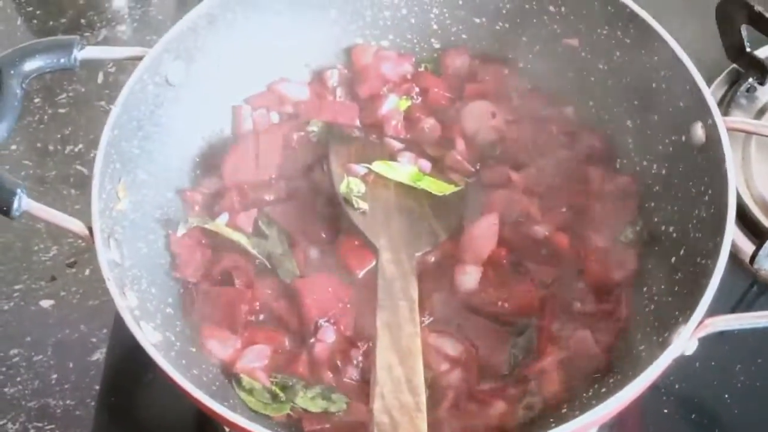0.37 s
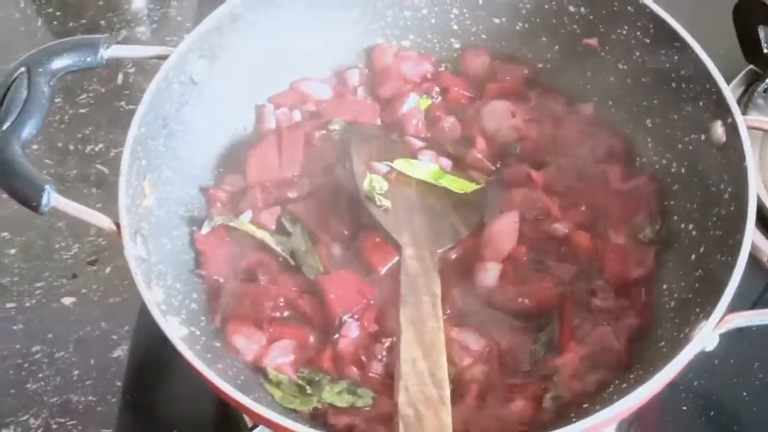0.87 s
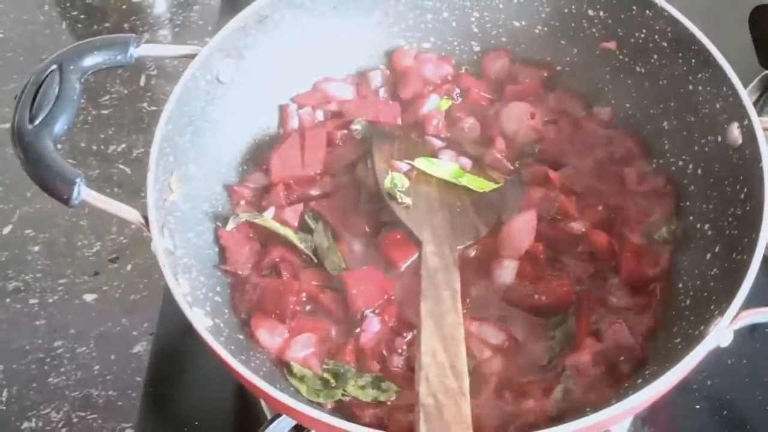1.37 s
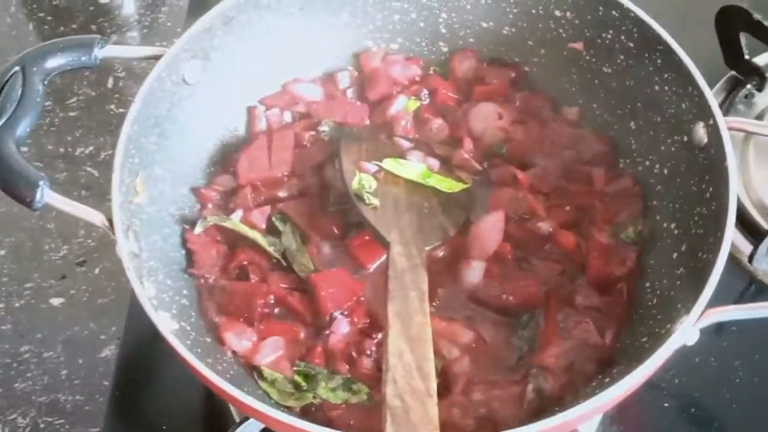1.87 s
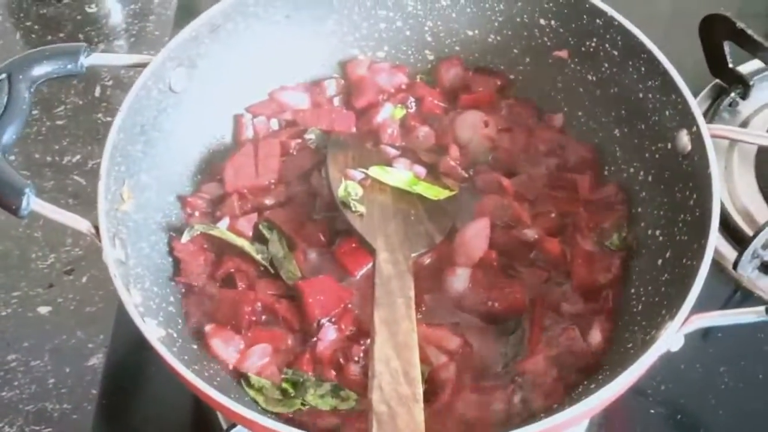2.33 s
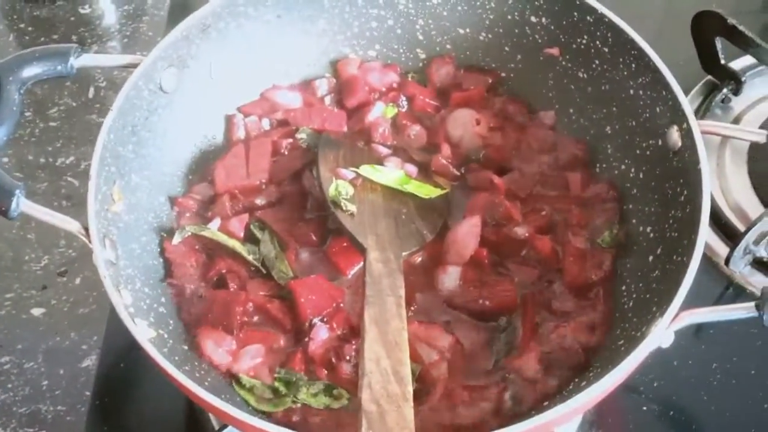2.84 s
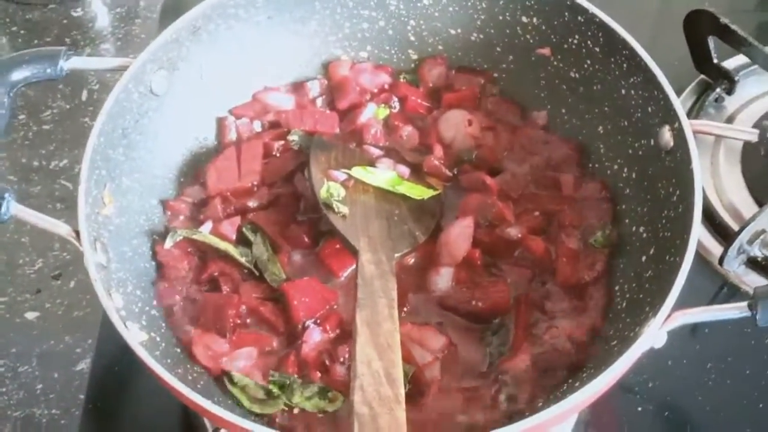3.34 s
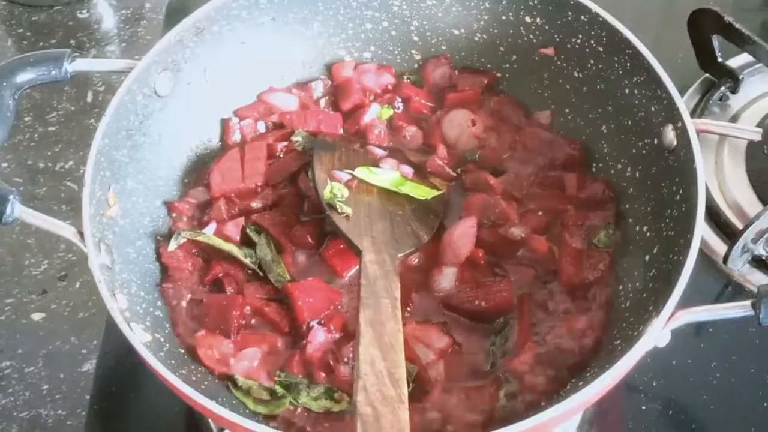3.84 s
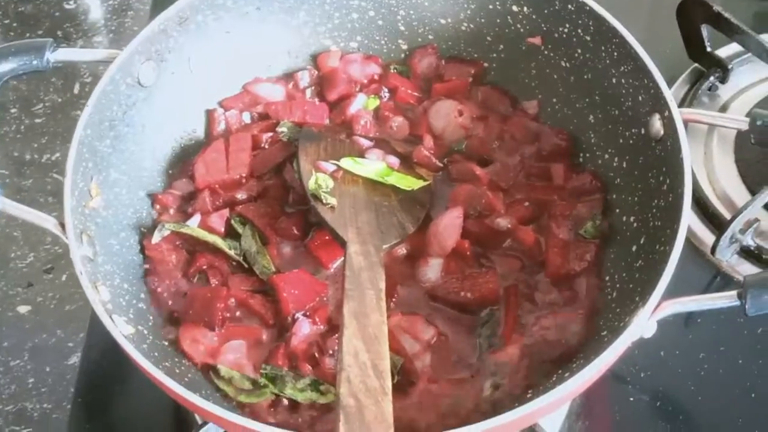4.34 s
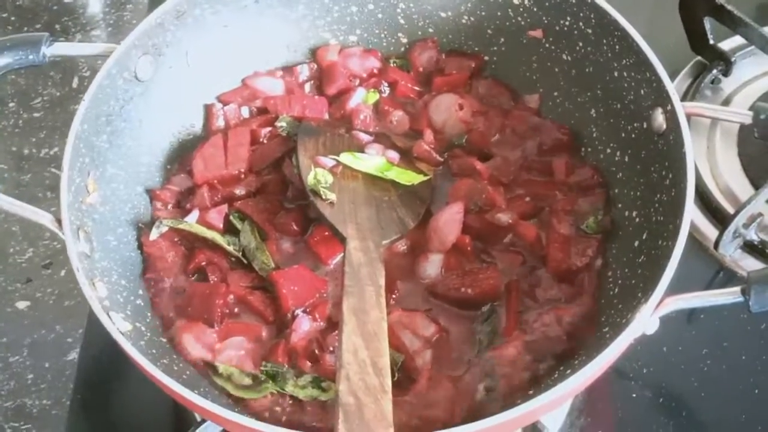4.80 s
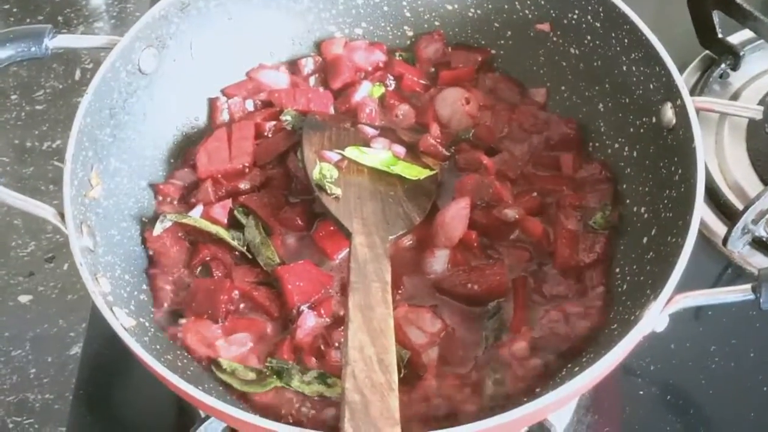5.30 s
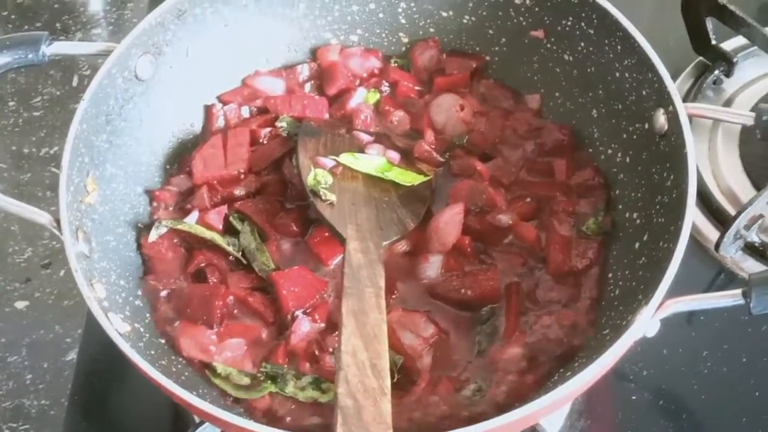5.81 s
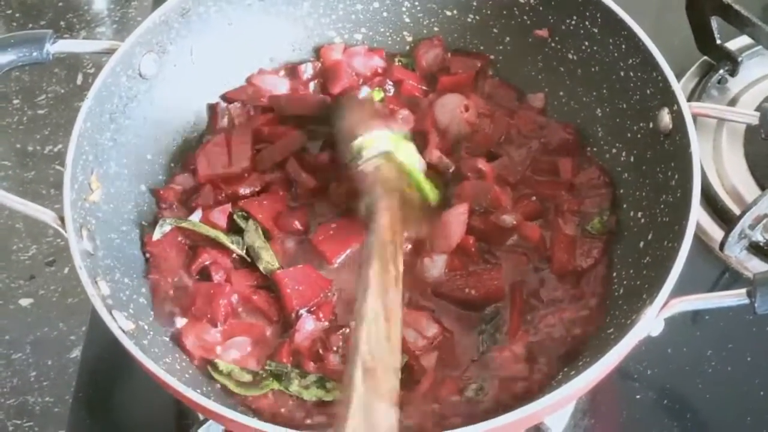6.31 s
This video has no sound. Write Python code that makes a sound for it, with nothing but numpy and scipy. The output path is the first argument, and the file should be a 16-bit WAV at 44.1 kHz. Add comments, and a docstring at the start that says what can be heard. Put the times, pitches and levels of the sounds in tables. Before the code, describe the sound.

Loud crackling sizzle in a hot pan, popping and spitting, gradually calms while utensils knock and a steel vessel clinks nearby in a kitchen.

```python
"""Pan cooling on a stove

Water sizzles under chopped vegetables in a hot pan and calms as it cools: noise hiss, a crackle of short damped
sines, loud pops and thin ticks; the pan's bowl colours hiss, crackle and pops. Utensils knock (filtered noise
bursts), a steel vessel rings (decaying modes), a far engine drones (wandering sines) in the room air.
At the end a spatula stirs the sizzle up again."""
import sys
import numpy as np
from scipy import signal
from scipy.fft import rfft, irfft
from scipy.io import wavfile
from scipy.ndimage import uniform_filter1d, map_coordinates

SR = 44100
rng = np.random.default_rng(int(sys.argv[2]) if len(sys.argv) > 2 else 0)


def to_linear_factor(level_db):
    """Convert decibel levels (scalar or array-like) to linear amplitude factors."""
    exponent = np.asarray(level_db, float) / 20
    return 10 ** exponent


def master_out(mix):
    """Clip the mix to full scale and print it as 16-bit PCM to the path in sys.argv[1]."""
    frames = np.transpose(np.atleast_2d(mix))
    ceiling = np.clip(frames, -1, 1)
    pcm = np.round(ceiling * 32767).astype(np.int16)
    wavfile.write(sys.argv[1], SR, pcm)


N = 294147

# kitchen air colour: (frequency [Hz], relative density [dB per Hz])
AIR_COLOUR = [(15, -42), (25, -11), (81, 0.5), (135, -3), (194, 0.5), (264, -1.5), (395, 0.5), (530, 0.5),
              (700, -5), (910, -40), (1540, -120)]
# far drone tones: (multiple of ENGINE_HZ [-], light-load level [dB], full-load level [dB], wander [dB]); orders
# 3, 5, 6 and 7 are the engine's, the first row is another low hum that follows the same pitch wander
DRONE_TONES = [(2.7, -10, 0, 3), (3, 0, -18, 2), (5, -17, -8, 2), (6, -7, -1, 1.5), (7, -11, -2, 2.5)]
# engine course: (time [s], load [0-1], base level of the tones [dB])
ENGINE_LOAD = [(0, .2, -58), (.9, 0.26, -60.5), (1.3, 0.8, -60.5), (2.4, 0.13, -54.5), (3.05, 0.97, -55.5),
               (3.8, 1, -59.5), (4.14, 1, -56), (4.4, 0, -55.5), (5.46, 0, -56), (6.67, 0, -56.5)]
# kitchen echo decay: (frequency [Hz], t60 [s])
ECHO_T60 = [(300, 0.95), (1500, 0.8), (6000, 0.21)]
# knocks beside the stove:
# (time [s], relative thud level [dB], thud centre [Hz], relative clack level [dB], contact t60 [s])
KNOCK_EVENTS = [(1.852, -21, 640, -36, 0.11), (1.868, -23, 1250, -24, 0.13),
                (2.895, -24.5, 710, -25, 0.094), (2.955, -23.5, 700, -27, 0.14),
                (2.967, -19, 915, -14.5, 0.17), (3.343, -26.5, 1200, -26.5, 0.39),
                (3.476, -19.5, 1420, -29, 0.34), (3.852, -22, 1106, -25.5, 0.25),
                (3.976, -26, 636, -24, 0.34), (4.056, -22, 1400, -23, 0.19), (4.085, -20.5, 604, -20, 0.1),
                (4.094, -18, 1445, -16, 0.087), (4.12, -23.5, 1620, -32, 0.26),
                (4.163, -24, 1480, -19, 0.1), (4.54, -17.5, 1130, -13.5, 0.17),
                (4.632, -23.5, 1300, -23, 0.1), (4.66, -25, 1490, -21, 0.079),
                (5.025, -25.5, 1120, -25, 0.13)]
# worktop resonances: (frequency [Hz], width [Hz], relative level [dB])
WORKTOP_MODES = [(302, 180, -2), (587, 51, -0.5), (678, 70, -1), (816, 98, 5), (927, 91, 1), (1218, 150, 0),
                 (1448, 185, 4.5), (1661, 200, -7)]
# clack colour: (frequency [Hz], relative density [dB per Hz])
CLACK_COLOUR = [(150, -23.5), (1800, -12.5), (3000, 3.5), (3700, 7.5), (4300, -12.5), (5500, -10),
                (6700, -0.5), (8300, -13.5), (15000, -68)]
# steel vessel modes, alternate rows loudest at opposite ends of the spot range:
# (frequency [Hz], relative level [dB], t60 [s])
STEEL_MODES = [(612, -15, .3), (944, 0, .33), (823, -4, .65), (1440, -13, .25), (1740, -12, .3),
               (1832, -6, .3), (2976, -2, .33), (2087, -8, .4), (3032, -3, .25), (3420, -10, .2),
               (3650, -12, .15), (4550, -12, .25), (6690, -13, .12), (5065, -15, .2)]
# blows on the vessel: (time [s], relative level [dB], hardness [dB per octave over 900 Hz], rim spot [0-1])
VESSEL_BLOWS = [(1.863, -25, -1, .2), (1.912, -23.5, 1, .2), (2.05, -32, -12, 0.6), (2.909, -25.5, 0, .3),
                (2.974, -18.5, 1.5, 0.72), (3.5, -46, 10, .3), (3.872, -40, 6, 0.5), (3.98, -42, 9.5, .3),
                (4.058, -23, 1, 0.35), (4.096, -20.5, 4, 0.34), (4.122, -28.5, 5, 0.33),
                (4.162, -35, 5, 0.2), (4.549, -27, -5, 0.7)]
# clearest ticks of spitting droplets: (time [s], relative peak level [dB])
CLEAR_TICKS = [(0.0922, -15), (1.5903, -10), (2.1231, -16), (2.6783, -15), (2.7212, -17), (2.8938, -20),
               (4.4278, -20), (4.5416, -13), (4.9212, -23), (5.0469, -22), (5.2036, -17), (6.1968, -20)]
# loudest pops: (time [s], relative peak level [dB], bubble pitch [Hz])
LOUD_POPS = [(0.0643, -2, 4800), (0.0834, -3, 2800), (0.1514, -2, 3000), (0.3057, -5, 4100),
             (0.4191, -3, 4700), (0.4668, -4, 4500), (0.5292, -6, 3300), (0.5544, -1, 4500),
             (0.635, -1, 3600), (0.6502, -3, 3400), (0.707, -3, 3800), (0.7183, -3, 2700),
             (0.826, -3, 3100), (1.3683, -1, 3000), (1.5479, -6, 4300), (1.5913, -2, 8500),
             (1.6753, -5, 3700), (1.9082, -6, 4200), (2.0492, -5, 5200), (2.124, -4, 7100),
             (2.153, -5, 7500), (2.2681, -5, 4300), (2.6795, -6, 8500), (2.8957, -8, 6500),
             (3.1488, -5, 3100), (3.4558, -8, 3100), (4.332, -7, 3100), (4.44, -9, 3000),
             (4.7566, -10, 3600), (5.1996, -7, 6400), (5.2049, -2, 6000), (5.4945, -12, 4400),
             (5.988, -10, 4100), (6.5134, -10, 3700)]
# boiling course: (time [s], relative sizzle level [dB], power share of the coarse colour [0-1])
BOIL_COURSE = [(0.0, -19.5, 0.66), (0.48, -20, 0.2), (0.93, -22, 0.63), (1.93, -21.5, 0.4),
               (2.64, -24, 0.29), (4.22, -26, 0.4), (4.36, -25.5, 0.27), (5.76, -27.5, 0.3),
               (6.06, -28, 0.33), (6.53, -28, 0.27), (6.61, -25, 0.4), (6.67, -25.5, 0.5)]
# pan colour, coarse bubbling: (frequency [Hz], relative density [dB per Hz])
COARSE_COLOUR = [(180, -39), (300, -28.5), (404, -18.5), (526, -41.5), (769, -13), (1180, -29.5),
                 (1420, -9.5), (2410, -13), (3190, 1), (5230, -20), (6820, -1), (8310, -23.5), (10600, -16),
                 (15600, -32.5)]
# pan colour, fine bubbling: (frequency [Hz], relative density [dB per Hz])
FINE_COLOUR = [(180, -52.5), (300, -34), (509, -23.5), (535, -23), (850, -10), (1040, -13), (1490, -8),
               (1620, -11), (3400, 3.5), (4290, -21), (6590, -8), (8450, -21.5), (11400, -20), (15600, -34)]

AIR_DB = -54  # rms
ENGINE_HZ, ENGINE_WANDER_RATIO = 30.6, 0.008
REACH_OCT, FAR_DB = 0.33, -18.5  # a knock wakes mostly the worktop modes this near its centre; floor for the rest
CONTACT_RISE_S, ROCK_RAD = 0.003, 0.45
# small pops and ticks: ever rarer and softer with time
COOLING_S, COOLING_DB_PER_S = 1.6, 0.2
SMALL_POP_REL_DB, SMALL_POP_HZ, SMALL_TICK_REL_DB = -6, 4110, -19.5
TOP_HZ = 15680


def unit(x):
    """Scaled to rms 1."""
    return x / np.sqrt(np.mean(x ** 2) + 1e-20)


def along(points, hz):
    """(Hz, value) points read on a log frequency axis."""
    f, v = np.transpose(points)
    return np.interp(np.log(hz + 1), np.log(f + 1), v)


def curves(rows):
    """One value per sample for each column after the time."""
    s, *cols = np.transpose(rows)
    return [np.interp(np.arange(N) / SR, s, c) for c in cols]


def wobble(rate_hz):
    """Smooth random curve, rate_hz knots a second."""
    knots = rng.standard_normal(int(N * rate_hz / SR) + 4)
    return map_coordinates(knots, [np.arange(N) * rate_hz / SR])


def answer(spectrum):
    """Causal minimum-phase impulse response with this (Hz, dB) colour, energy 1."""
    size = 2 ** 12
    level_db = along(spectrum, np.fft.rfftfreq(size, 1 / SR))
    cepstrum = irfft(np.log(to_linear_factor(level_db) + 1e-6))
    # fold the cepstrum onto positive time
    cepstrum = np.r_[cepstrum[0], 2 * cepstrum[1:size // 2], np.zeros(size // 2)]
    h = irfft(np.exp(rfft(cepstrum)))[:size // 2]
    return h / np.linalg.norm(h)


def through(x, h):
    """x convolved with h."""
    return signal.fftconvolve(x, h)[:N]


def echo():
    """Fresh half-second room tail, each frequency dying at its own speed, energy 1."""
    hz, t, z = signal.stft(rng.standard_normal(SR // 2), SR, nperseg=256)
    decay = to_linear_factor(-60 * t / along(ECHO_T60, hz)[:, None])
    tail = signal.istft(z * decay, SR, nperseg=256)[1]
    return tail / np.linalg.norm(tail)


def in_kitchen(sounds, wet_db):
    """(s, sound) pairs placed in time, each followed by its own echo."""
    out = np.zeros(N + 2 * SR)
    for s, direct in sounds:
        wet = to_linear_factor(wet_db) * signal.fftconvolve(direct, echo())
        out[round(s * SR):][:len(direct)] += direct
        out[round((s + 0.006) * SR):][:len(wet)] += wet
    return out[:N]


def cooling(count):
    """Random times that thin out as the pan cools, a level offset [dB] and a normal draw for each."""
    draw = rng.random((count, 2))
    reached = 1 - np.exp(-(N / SR - 0.05) / COOLING_S)
    s = -COOLING_S * np.log(1 - draw[:, 0] * reached) + 0.02
    offset_db = -COOLING_DB_PER_S * s + 4 * (draw[:, 1] - 0.5)
    return s, offset_db, rng.standard_normal(count)


def background():
    """Room air as coloured noise; a far engine's tones and another low hum wander and change balance with its
    load."""
    load, level_db = curves(ENGINE_LOAD)
    load = load.clip(0, 1)
    turns = np.cumsum(ENGINE_HZ * (1 + ENGINE_WANDER_RATIO * wobble(5))) / SR
    drone = np.zeros(N)
    for order, light_db, loaded_db, wander_db in DRONE_TONES:
        tone_db = level_db + light_db + load * (loaded_db - light_db) + wander_db * wobble(9.7)
        drone += np.sqrt(2) * to_linear_factor(tone_db) * np.sin(2 * np.pi * order * turns)
    return drone + to_linear_factor(AIR_DB) * through(rng.standard_normal(N), answer(AIR_COLOUR))


def worktop(centre_hz):
    """Thud response: the worktop's resonances, strongest near the centre."""
    f = np.geomspace(60, 16000, num=400)
    power = np.zeros(len(f))
    for hz, width_hz, db in WORKTOP_MODES:
        woken = np.exp(-(np.log2(hz / centre_hz) / REACH_OCT) ** 2) + to_linear_factor(2 * FAR_DB)
        detune = (f - hz * hz / f) / width_hz
        power += to_linear_factor(2 * db) * woken / (1 + detune ** 2) ** 1.23
    return answer(list(zip(f, 10 * np.log10(power + 1e-9))))


def knocks():
    """Each knock is a rough contact: a dull thud of the worktop and a gritty clack."""
    t, sounds = np.arange(SR // 4) / SR, []
    for s, thud_db, hz, clack_db, t60_s in KNOCK_EVENTS:
        envelope = (1 - np.exp(-t / CONTACT_RISE_S)) * to_linear_factor(1.5 - 60 * t / max(t60_s, 0.01))
        grit = to_linear_factor(1.8 * wobble(132)[:len(t)])
        contact = envelope * grit * rng.standard_normal((2, len(t)))
        thud = to_linear_factor(thud_db) * through(contact[0], worktop(hz))
        clack = to_linear_factor(clack_db) * through(contact[1], answer(CLACK_COLOUR))
        sounds.append((s, thud + clack))
    return in_kitchen(sounds, wet_db=-11.5)


def vessel():
    """Every blow rings the steel at new strengths; it rocks on the worktop, so the ring is uneven."""
    t, sounds = np.arange(SR * 3 // 4) / SR, []
    for s, blow_db, hard_db, spot in VESSEL_BLOWS:
        rock = ROCK_RAD * wobble(45)[:len(t)]
        reach = np.cos(spot * np.pi / 2), np.sin(spot * np.pi / 2)
        ring = np.zeros(len(t))
        for k, (hz, db, t60_s) in enumerate(STEEL_MODES):
            mode_db = blow_db + hard_db * np.log2(hz / 900) + db + rng.normal(0, 1.5)
            phase = 2 * np.pi * (hz * t + rng.random()) + rock
            ring += reach[k % 2] * to_linear_factor(mode_db - 60 * t / t60_s) * np.sin(phase)
        onset = 1 - np.exp(-t / 0.003)
        sounds.append((s, ring * onset * to_linear_factor(3 * wobble(60)[:len(t)])))
    return in_kitchen(sounds, wet_db=-14)


def ticks():
    """A droplet spits: a click that is nearly all treble and a brief spray behind."""
    spit, t = np.zeros(N), np.arange(SR // 40) / SR
    at_s, offset_db, _ = cooling(count=40)
    s, db = np.transpose(CLEAR_TICKS + list(zip(at_s, SMALL_TICK_REL_DB + offset_db)))
    spit[np.round(s * SR).astype(int)] = to_linear_factor(db - 4.0)
    spray = through(spit, to_linear_factor(-17 - 60 * t / 0.037)) * rng.standard_normal(N)
    click = answer([(6000, -27), (9000, -3), (11000, 5), (14500, -1), (17000, -34)])
    return through(spit + spray, click / np.abs(click).max())


def pops():
    """A large bubble bursts: a push about one cycle long and a short spray, rung by the pan."""
    out, pan, t = np.zeros(N + SR), answer(COARSE_COLOUR)[:600], np.arange(300) / SR
    at_s, offset_db, size = cooling(count=45)
    small = list(zip(at_s, SMALL_POP_REL_DB + offset_db, SMALL_POP_HZ * np.exp(0.3 * size)))
    for s, db, hz in LOUD_POPS + small:
        push = -np.cos(2 * np.pi * hz * t) * np.exp(-t * hz / 0.6)
        spray = to_linear_factor(-15 - 60 * t / 0.012) * rng.standard_normal(len(t))
        pop = np.convolve(push + spray, pan)
        # the peak lands 9 samples after s
        at = round(s * SR) - np.abs(pop).argmax() + 9
        out[at:at + len(pop)] += to_linear_factor(db - 1) * pop / np.abs(pop).max()
    return out[:N]


def bursts(count, spread_db, hz, cycles):
    """Bubbles bursting at random: short damped sines, a few far louder than the rest, rms 1."""
    draw, t = rng.random((count, 2)), np.arange(64) / SR
    pitch_hz = hz * np.exp(0.616 * rng.standard_normal((count, 1))).clip(0.25, 3.5)
    size = to_linear_factor(spread_db * np.minimum(-np.log(1 - draw[:, 1:]), 3.2))
    ringing = np.cos(2 * np.pi * pitch_hz * t) * np.exp(-t * pitch_hz / cycles)
    wave = size * ringing * np.sqrt(pitch_hz / hz)
    at = (draw[:, :1] * N).astype(int) + np.arange(len(t))
    x = np.bincount(at.ravel(), wave.ravel())[:N]
    # whitened, since the pan gives the colour
    z = rfft(x)
    smooth_power = uniform_filter1d(np.abs(z) ** 2, size=3000)
    return unit(irfft(z / np.sqrt(smooth_power), N))


def sizzle():
    """Hiss of countless tiny bubbles under the crackle of larger ones; both surge, coloured by the pan."""
    level_db, share = curves(BOIL_COURSE)
    share = share.clip(0, 1)
    surge_db = 0.5 * wobble(17) + 0.61 * wobble(35)
    hiss = rng.standard_normal(N) * to_linear_factor(surge_db)
    crackle = bursts(count=14000, spread_db=6.5, hz=4630, cycles=1.97) * to_linear_factor(1.5 * surge_db)
    stream = to_linear_factor(level_db) * (to_linear_factor(-5.0) * hiss + to_linear_factor(-8.5) * crackle)
    coarse = through(stream * np.sqrt(share), answer(COARSE_COLOUR))
    fine = through(stream * np.sqrt(1 - share), answer(FINE_COLOUR))
    return coarse + fine


def scene():
    """Pan, worktop and kitchen, one channel."""
    return (background() + knocks() + vessel() + ticks() + pops() + sizzle())[None]


def roll_off(x):
    """The treble ends steeply here."""
    return signal.sosfilt(signal.butter(12, 15720, fs=SR, output="sos"), x)


def record(dry):
    """Cuts everything from TOP_HZ up."""
    passed = np.fft.rfftfreq(N, 1 / SR) < TOP_HZ
    mix = irfft(rfft(dry) * passed, N)
    return roll_off(mix)


dry = scene()
out = record(dry)
master_out(out)
```